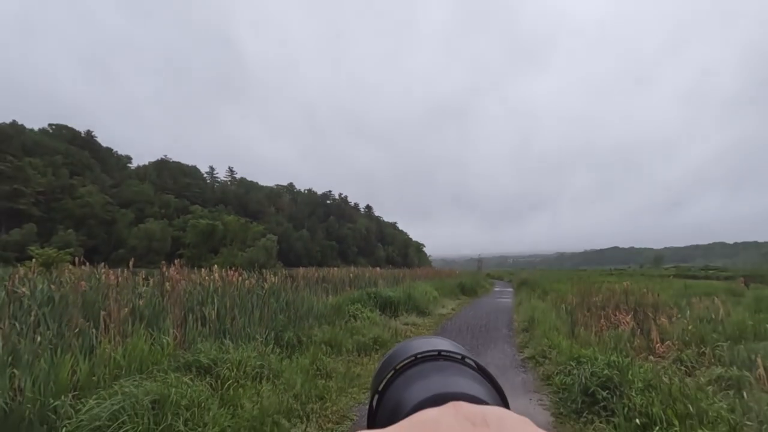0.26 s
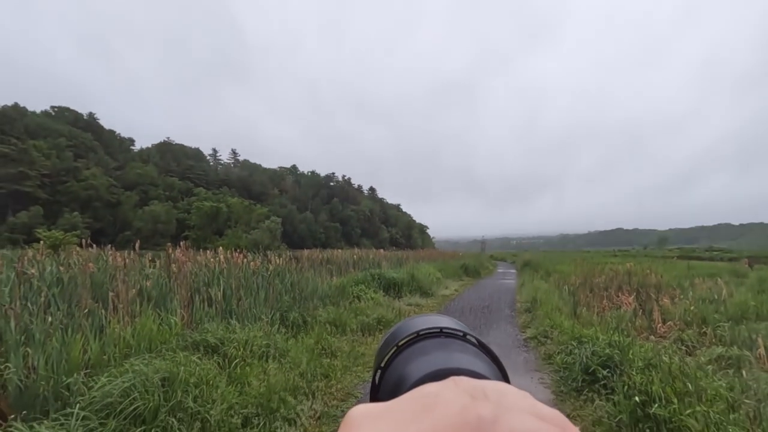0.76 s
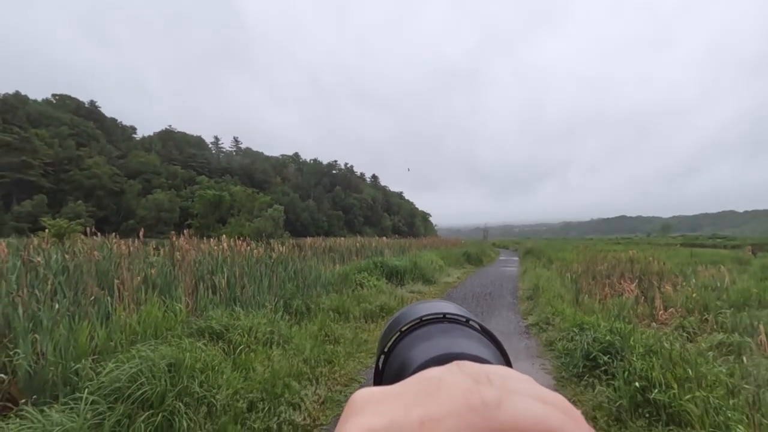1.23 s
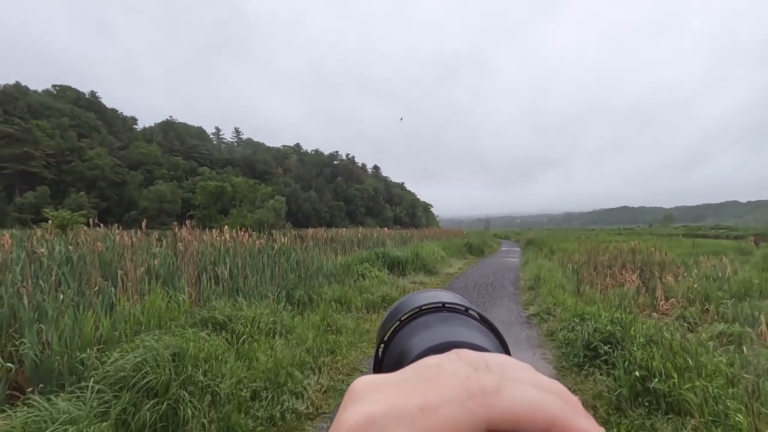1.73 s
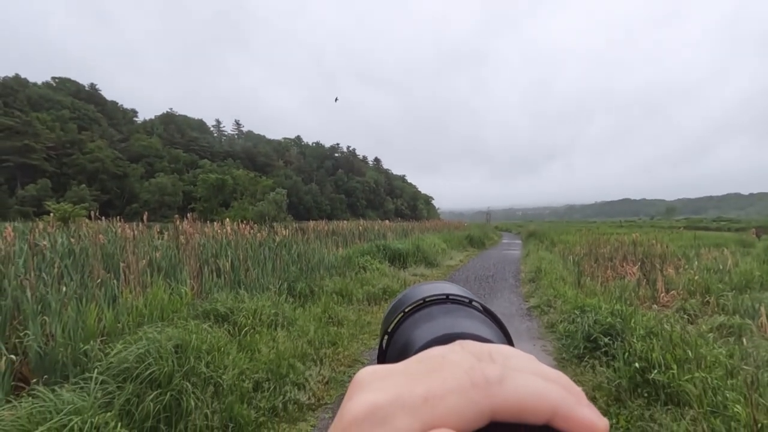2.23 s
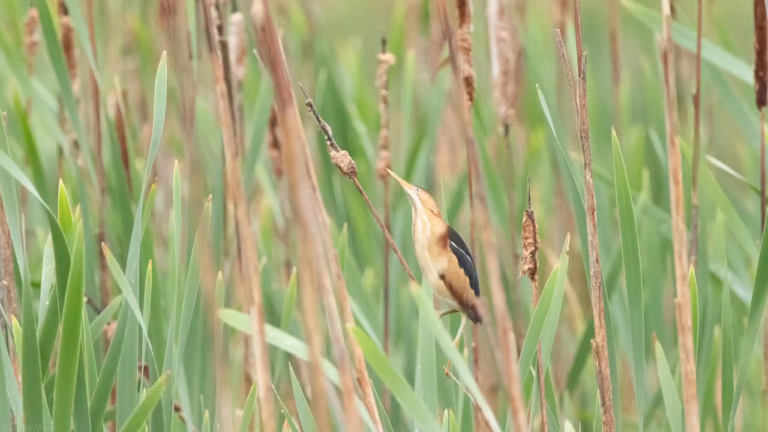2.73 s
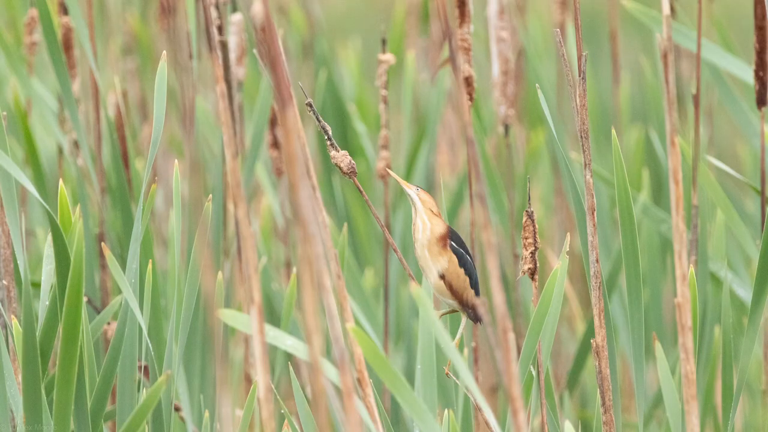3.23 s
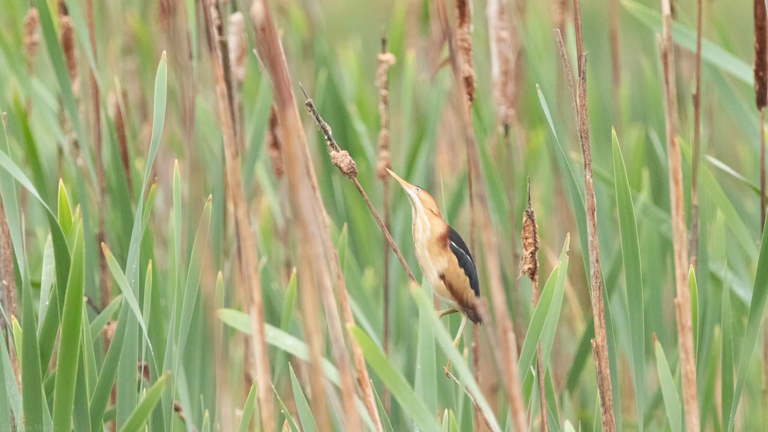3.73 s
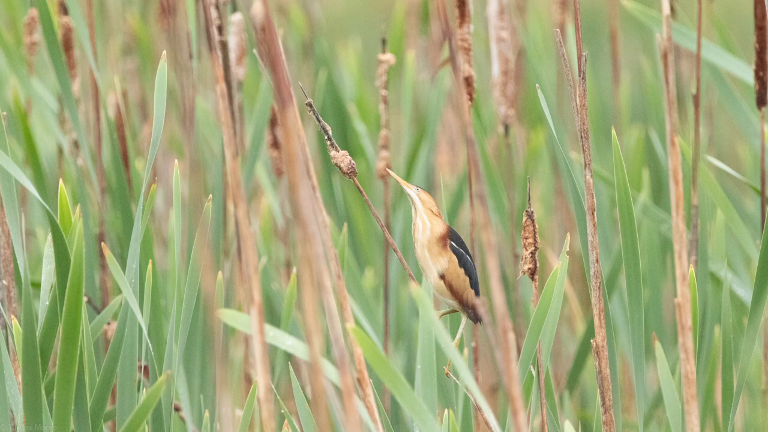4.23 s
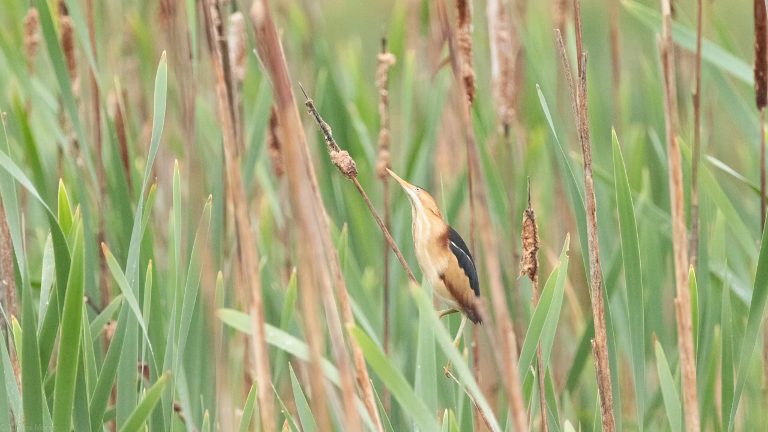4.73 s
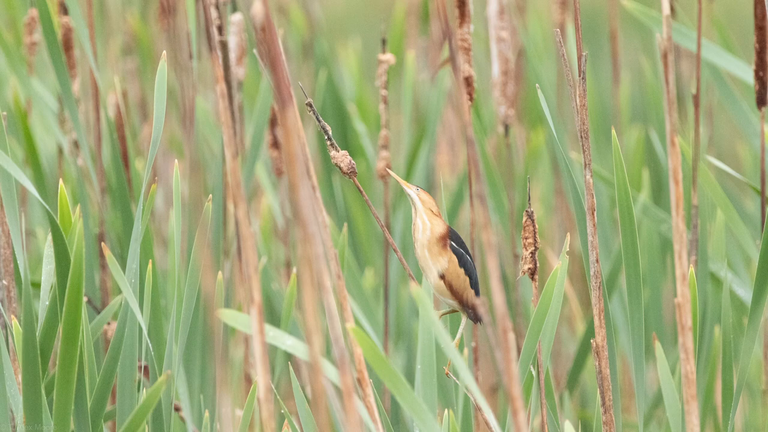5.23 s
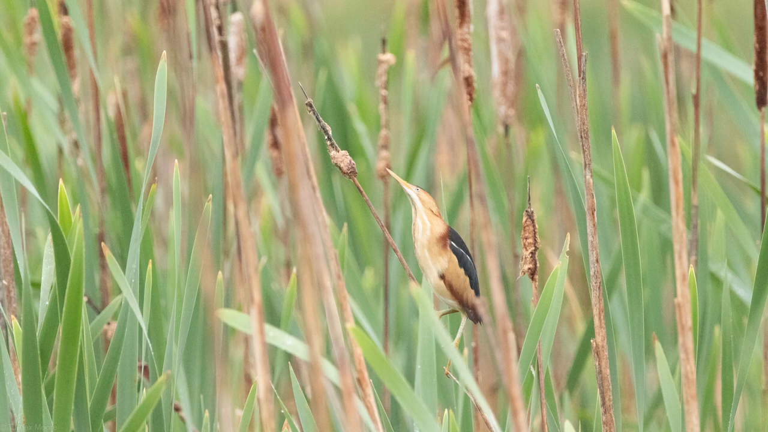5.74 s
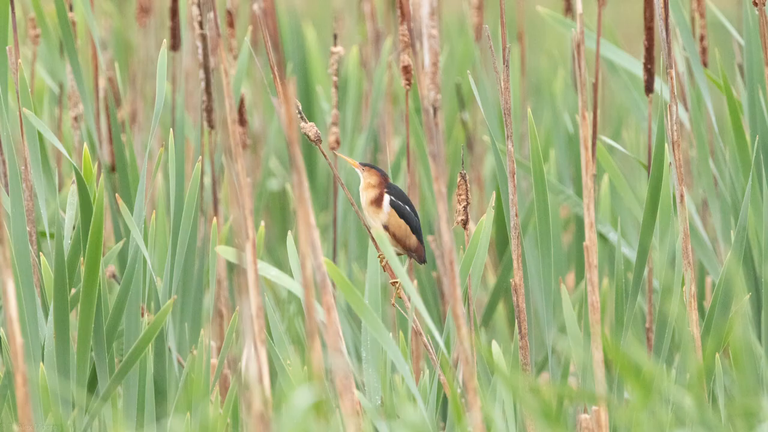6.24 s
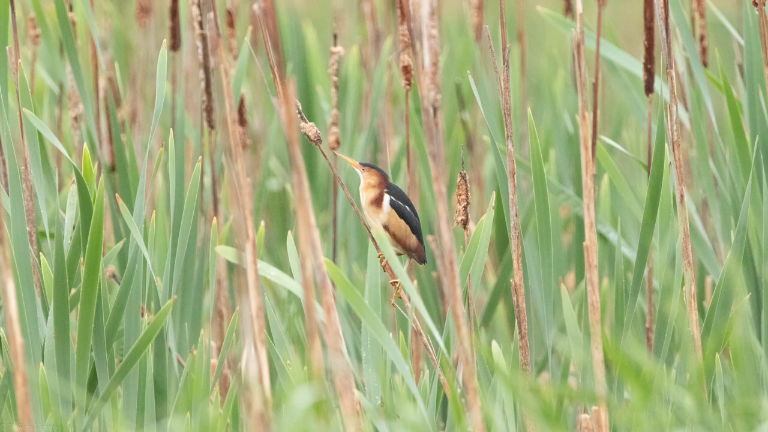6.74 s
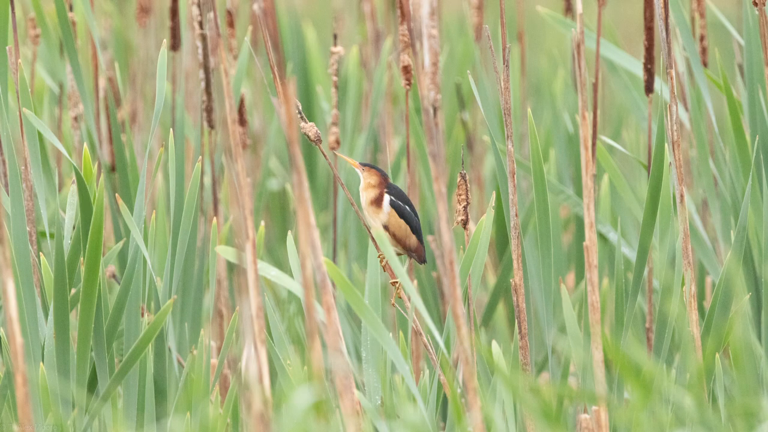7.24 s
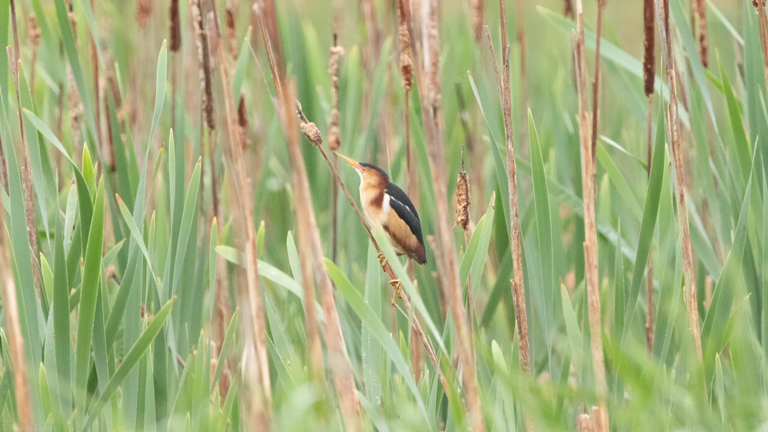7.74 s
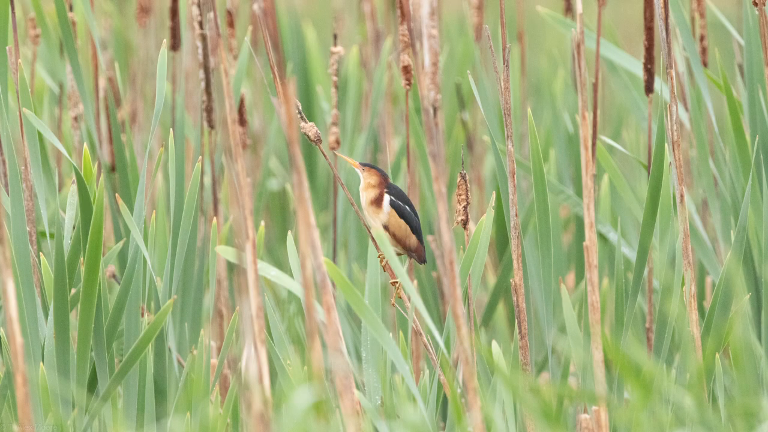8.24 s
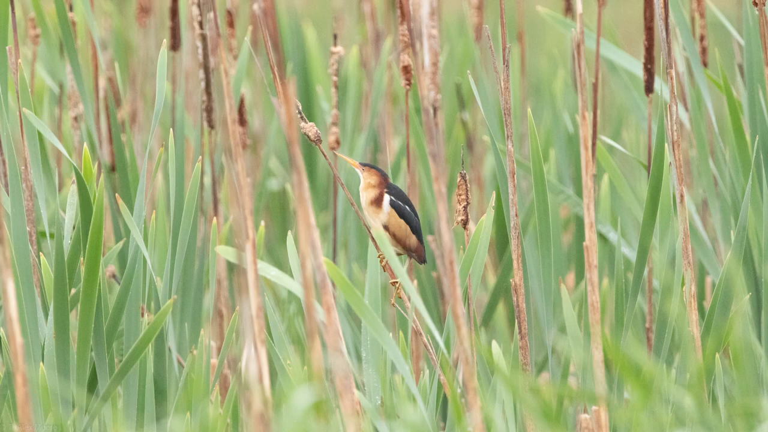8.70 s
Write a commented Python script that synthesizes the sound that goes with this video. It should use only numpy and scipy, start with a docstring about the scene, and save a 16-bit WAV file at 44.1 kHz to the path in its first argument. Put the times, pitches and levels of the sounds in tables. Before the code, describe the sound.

Two single camera shutter clacks close by in an open marsh, with small birds chirping, a frog twanging and light wind on the microphone.

```python
"""Camera in an open marsh

Close to the microphone a hand-held reflex camera takes two pictures: a latch ticks, then noise bursts ring
its body as mirror, curtains and winder clatter. Fingers knock on the lens barrel, exciting its damped modes.
In the reeds a frog twangs with rough pulses through a resonant throat, and birds slur, chip, whistle, rattle
and buzz on gliding tones. Filtered noise makes the wind on the microphone and a background hush of marsh
and microphone noise, over a distant chorus of short, blurred notes.
"""
import sys
import numpy as np
from scipy import signal
from scipy.fft import rfft, irfft
from scipy.io import wavfile
from scipy.ndimage import uniform_filter1d

SR = 44100
rng = np.random.default_rng(int(sys.argv[2]) if len(sys.argv) > 2 else 0)


def waveform_to_disk(signal):
    """Save audio, clipped to [-1, 1], as 16-bit WAV at the path in sys.argv[1]."""
    frames = np.transpose(np.atleast_2d(signal))
    scaled = np.clip(frames, -1, 1) * 32767
    samples = np.round(scaled).astype(np.int16)
    wavfile.write(sys.argv[1], SR, samples)


N = 395577
T = np.arange(N) / SR

# hard clatter of small camera parts, as a spectrum: [f/Hz, density/dB per Hz]
CLATTER = [(300, -12.5), (700, -3.5), (1300, 3), (2500, 3.5), (5000, 5.5), (6600, 0.5), (8000, -6),
           (11000, -17), (15000, -41)]
SLUR_T60_S = 0.7  # the high slurs carry to the wood and linger


def undb(db):
    """Decibels to gain."""
    return 10 ** (np.asarray(db) / 20)


def unit(x):
    """Scale to rms 1."""
    return x / np.sqrt(np.mean(x ** 2))


def fade(t, t60):
    """Exponential decay that starts at t = 0 and loses 60 dB in t60 seconds."""
    return (t >= 0) * np.exp(-np.log(1000) * np.maximum(t, 0) / max(abs(t60), 1 / SR))


def add(out, s, x):
    """Mix x into out from time s on."""
    i = max(int(s * SR), 0)
    k = max(min(x.shape[-1], N - i), 0)
    out[..., i:i + k] += x[..., :k]


def pan(left_db):
    """Gains of the two channels for a left-minus-right level."""
    return undb(np.array([[left_db], [-left_db]]) / 2)


def convolve(x, response):
    """Pass x through a response scaled to unit power."""
    response = np.atleast_2d(response / np.sqrt(np.sum(response ** 2, axis=-1, keepdims=True)))
    return signal.oaconvolve(np.atleast_2d(x), response, axes=-1)[:, :x.shape[-1]]


def colour(x, points):
    """Causal minimum-phase filter of unit power through (Hz, dB) points."""
    hz, db = np.transpose(points)
    size = 2 ** 14
    f = np.maximum(np.fft.rfftfreq(size, 1 / SR), 1)
    cepstrum = irfft(np.log(undb(np.interp(np.log(f), np.log(hz), db))))
    # folding the cepstrum forward in time makes the filter causal
    cepstrum[1:size // 2] *= 2
    cepstrum[size // 2 + 1:] = 0
    return convolve(x, irfft(np.exp(rfft(cepstrum))))


def ring(x, modes, in_phase=False):
    """Damped modes (Hz, width, dB) driven by x; neighbours swing against each other unless in phase."""
    t = T[:SR // 10]
    response = np.zeros(len(t))
    for k, (hz, width, db) in enumerate(modes):
        angle = 2 * np.pi * hz * t
        swing = np.cos(angle) if in_phase else (-1) ** k * np.sin(angle)
        response += undb(db) * width * np.exp(-np.pi * width * t) * swing
    return convolve(x, response)


def stereo_noise(size, side_db):
    """Noise with a part common to both sides and a part opposed between them."""
    mid, side = rng.standard_normal((2, size))
    return unit(mid + undb(side_db) * side * np.array([[1], [-1]]))


def walk(rate, size=N):
    """Smoothed random drift of rms 1, drawn afresh rate times a second."""
    k = int(SR / rate)
    steps = np.repeat(rng.standard_normal(size // k + 1), k)
    return unit(uniform_filter1d(uniform_filter1d(steps, k), k)[:size])


def scatter(x, t60):
    """Reeds and the wood's edge scatter a sound into a soft tail."""
    t = T[:SR]
    onset = 1 - np.exp(-t / 0.0029)
    return convolve(x, stereo_noise(len(t), side_db=-4.0) * fade(t, t60) * onset)


def rattle(t, t60, grain_db, side_db, blow):
    """A first blow, then a dying swarm of tiny collisions of uneven size."""
    sizes = unit(uniform_filter1d(undb(grain_db * rng.standard_normal(len(t))), size=12))
    force = stereo_noise(len(t), side_db) * sizes * fade(t, t60)
    force[:, 0] += blow
    return force


def note(hz, edge):
    """A bird's nearly pure tone on a pitch track, with soft ends."""
    window = signal.windows.tukey(len(hz), np.clip(edge, 0, 1))
    return np.sqrt(2) * window * np.sin(2 * np.pi * np.cumsum(hz) / SR)


def arc(length, start, middle, end):
    """A pitch track bending through three frequencies."""
    u = np.linspace(0, 1, max(int(length * SR), 2))
    return np.polyval(np.polyfit([0, .5, 1], [start, middle, end], 2), u)


def whistle(hz):
    """A whistled note; wide slurs are less steady than held ones."""
    unsteady = 0.0025 + 0.075 * np.std(hz) / np.mean(hz)
    tone = note(hz * (1 + unsteady * walk(700, len(hz))), edge=0.51)
    return tone * undb(2 * walk(110, len(hz)))


def buzz(length, centre, swing, rate, rough, fade_db, open_s):
    """A trill that starts as a plain tone, then snaps up and slides down many times a second."""
    t = T[:int(length * SR)]
    edge_s = 0.026  # swell and dying away, shortened in brief trills
    cycle = 2 * np.pi * np.cumsum(rate * (1 + 0.018 * walk(40.2, len(t)))) / SR
    sweep = np.sin(np.pi / 2 * signal.sawtooth(cycle, .15))
    opening = 1 - np.exp(-(t / open_s) ** 2)
    hz = centre + swing * opening * (sweep + rough * walk(500, len(t)))
    tone = note(hz, edge=min(2 * edge_s / length, .6))
    # the low turn of each sweep sounds strongest, and the loudness wavers
    return tone * centre / hz * undb(fade_db * t / length + 2 * walk(90, len(t)))


def background_hush():
    """A steady background hush of marsh and microphone noise, filtered noise swelling a little."""
    # background hush with microphone hiss near 12 kHz: [f/Hz, density/dB per Hz]
    hush = [(60, -10.5), (170, -4.5), (330, -10.5), (600, -16.5), (1300, -15.5), (2100, -23.5),
            (2700, -23.5), (3700, -25), (6000, -37), (7600, -35), (9500, -53), (12000, -47.5),
            (15000, -73.5)]
    return unit(colour(stereo_noise(N, side_db=-5.5), hush)) * undb(-61.0 + 1.72 * walk(2.089))


def wind():
    """Gusts rock the microphone, finer turbulence rides on them, single eddies thud."""
    # wind at the microphone: [t/s, strength/dB]
    gusts = [(0.0, -45.5), (0.52, -43.5), (1.0, -39.5), (1.4, -43), (1.98, -42), (2.06, -32.5),
             (2.3, -49.5), (2.38, -40.5), (2.66, -53), (3.86, -46.5), (3.92, -36.5), (4.28, -45),
             (4.36, -29), (4.88, -42), (5.46, -45), (5.74, -30.5), (6.06, -53), (6.14, -37.5), (6.46, -54),
             (6.72, -49.5), (6.79, -36), (6.98, -44.5), (7.04, -33.5), (7.68, -48.5), (8.0, -34.5),
             (8.4, -43), (8.48, -36), (8.66, -50), (8.86, -37.5), (8.96, -45)]
    # slow pressure swings, then finer turbulence: [f/Hz, density/dB per Hz]
    buffet = [(10, -5), (22, 3), (35, 0), (55, -5), (80, -15.5), (130, -35), (600, -90.5)]
    turbulence = [(40, -18.5), (95, 0.5), (170, -7), (260, -17), (500, -31), (1200, -52), (8000, -94.5)]
    # eddies that hit the microphone ports: [t/s, width/s, level/dB]
    eddies = [(0.611, 0.0022, -35), (0.768, 0.0032, -32), (0.982, 0.0029, -35), (4.375, 0.0058, -20.5),
              (4.489, 0.002, -15), (5.537, 0.0039, -31), (5.745, 0.0033, -23), (8.291, 0.0021, -33)]
    buffet_db, turbulence_db, gusts_per_s, gust_db = 1, -17.5, 16, 4
    strength = undb(np.interp(T, *np.transpose(gusts)) + gust_db * walk(gusts_per_s))
    slow = colour(stereo_noise(N, side_db=-13), buffet)
    # the gust sets the strength, so the random swell is evened out
    slow = slow / np.sqrt(uniform_filter1d(np.mean(slow ** 2, axis=0), size=4000))
    fine = unit(colour(stereo_noise(N, side_db=-6.5), turbulence))
    out = strength * (undb(buffet_db) * slow + undb(turbulence_db) * fine)
    for when, width, db in eddies:
        u = (T - when) / width
        out = out + undb(db) * (1 - u ** 2) * np.exp(-u ** 2 / 2)
    return out * pan(-5)


def chorus():
    """Many far birds, short slurs up and down, blurred by distance."""
    # far birds: [t/s, level/dB]
    distance_levels = [(0, -57.5), (.6, -56), (1.1, -65.5), (1.4, -77), (2.3, -69), (2.8, -66), (3.4, -66),
                       (4.3, -70.5), (5, -66), (5.8, -68.5), (6.8, -61.5), (7.5, -73), (8.97, -91.5)]
    out = np.zeros(N)
    for when, span, pitch, slope, bend, size in rng.random((1400, 6)):
        hz = 3150 + 3200 * pitch
        glide = -.13 + 0.3 * slope
        track = arc(0.01793 + 0.037 * span, hz * (1 + glide), hz * (1 + 0.2 * (bend - .5)), hz * (1 - glide))
        add(out, when * N / SR, undb(-12 * size - 4 * pitch) * note(track, edge=0.53))
    blurred = unit(undb(-4.5) * out + scatter(out, t60=.4))
    return blurred * undb(np.interp(T, *np.transpose(distance_levels)))


def slurs():
    """Falling slurs, alone or in even runs, each a straight downward glide of a whistle."""
    # runs: [first t/s, notes, spacing/s, note length/s, top f/Hz, end f/Hz, level/dB]
    runs = [(0, 1, 0, 0.015, 5300, 3730, -48.5), (0.619, 3, 0.15, 0.067, 8070, 5070, -64.5),
            (3.313, 3, 0.16, 0.055, 6700, 4880, -70), (4.888, 2, 0.17, 0.03, 8200, 4400, -63.5),
            (5.203, 5, 0.12, 0.075, 7390, 3700, -54.5), (6.927, 2, 0.165, .09, 7800, 5850, -67),
            (7.298, 1, 0, 0.051, 6880, 4280, -63.5)]
    out = np.zeros(N)
    for first, notes, apart, length, top, end, db in runs:
        for k in range(round(notes)):
            add(out, first + k * apart, undb(db) * whistle(np.linspace(top, end, int(length * SR))))
    return out


def frog():
    """A plucked-string call: rough pulses slacken in pitch, burst twice in a sinking throat and leave a low hum."""
    # twangs: [t/s, level/dB, half-width of the bright burst/s, second gulp/dB, hum/dB]
    twangs = [(.004, -30, 0.018, -3.5, 0), (2.024, -27, 0.017, -10, -4), (4.384, -37, 0.0061, -13.5, -12)]
    # throat resonances at the first burst: [f/Hz, width/Hz, level/dB]
    throat = [(354, 38, 16.5), (635, 310, 10), (1154, 210, 14), (1369, 82, 25.5), (1822, 150, 10.5),
              (2700, 258, 7.5)]
    # the call loses its treble steeply: [f/Hz, level/dB]
    treble_loss = [(250, 2), (1950, -4), (2350, -15.5), (5000, -32.5)]
    burst_s, gulp_s, gulp_width_s = 0.024, 0.062, 0.02
    gulp_sag = .1  # the throat sinks by this share for the second gulp
    t = T[:SR // 3]
    burst, gulp, hum = np.zeros((3, N))
    for s, db, width, gulp_db, hum_db in twangs:
        hz = 118 + 68 * np.exp(-t / .07)
        phase = 2 * np.pi * np.cumsum(hz * (1 + 0.016 * walk(158, len(t)))) / SR
        pulses = unit(sum(np.cos(k * phase) for k in range(2, 16)))
        rasp = rng.standard_normal(len(t))
        burst_shape = np.exp(-((t - burst_s) / width) ** 2)
        gulp_shape = np.exp(-((t - gulp_s) / gulp_width_s) ** 2)
        add(burst, s, undb(db) * burst_shape * (0.11 * pulses + .5 * rasp))
        add(gulp, s, undb(db + gulp_db) * gulp_shape * (0.12 * pulses + .2 * rasp))
        low = np.sin(2 * phase) + 0.97 * np.sin(3 * phase) + 0.64 * np.sin(4 * phase)
        hum_shape = np.minimum(t / 0.2, 1) * fade(np.maximum(t - .05, 0), t60=0.22)
        add(hum, s, undb(db + hum_db) * low * hum_shape)
    sunk = [(hz * (1 - gulp_sag), width, db) for hz, width, db in throat]
    call = colour(ring(burst, throat) + ring(gulp, sunk), treble_loss) * undb(-8.5) + hum
    return (call + undb(-14) * scatter(call, t60=0.64)) * pan(5.3)


def twitterer():
    """Each twitter is a fast buzz that dips and rises steeply, then a flick downwards."""
    # twitters: [t/s, pitch f/Hz, level/dB]
    twitters = [(.108, 4200, -49), (.236, 4280, -52), (5.917, 4550, -56), (6.036, 4430, -51.5),
                (6.812, 4550, -43.5)]
    # evenly spaced course of the buzz: [share of its pitch]
    course = (0.89, 1.11, 1.02, 0.99, 1.02, 1.2, 1)
    length_s, swing_hz, sweeps_per_s = .066, 300, 205
    flick_s, flick_start, flick_end, flick_db = 0.018, 1.13, .87, -5  # start and end in shares of the pitch
    out = np.zeros(N)
    u = np.linspace(0, 1, int(length_s * SR))
    shape = np.interp(u, np.linspace(0, 1, len(course)), course)
    for s, hz, db in twitters:
        trill = buzz(length_s, hz * shape, swing_hz, sweeps_per_s, rough=0.092, fade_db=1.5, open_s=0.0063)
        add(out, s, undb(db) * trill)
        flick = hz * np.geomspace(flick_start, flick_end, int(flick_s * SR))
        add(out, s + length_s - flick_s / 4, undb(db + flick_db) * whistle(flick))
    return out


def fingers():
    """The grip shifts: short knocks ring the lens barrel, with dry ticks; a creak is a string of faint ones."""
    # clear finger knocks: [t/s, level/dB, dry tick/dB]
    knocks = [(0.203, -31.5, -15), (.2105, -41, -22), (.261, -46.5, -24), (.281, -43.5, -15),
              (1.111, -46.5, -1), (1.164, -44, -9), (1.187, -43.5, -10), (1.222, -44.5, -17),
              (1.251, -46.5, -12), (1.708, -43, -14), (4.376, -44, -22), (4.6751, -43, -18),
              (6.652, -49, 0), (7.656, -49, -11), (8.400, -58.5, -3.5)]
    # creaks of the grip: [t/s, length/s, level/dB]
    creaks = [(0.222, .05, -45), (0.906, .06, -54), (4.486, .03, -53.5)]
    # lens barrel modes: [f/Hz, width/Hz, level/dB]
    barrel = [(426, 133, -0.5), (730, 37, 4), (990, 96, 6.5), (1380, 97, 5.5), (1820, 220, 3),
              (2120, 230, 2.5), (2836, 69, -1.5), (5150, 130, -8.5), (3540, 580, -17)]
    ticks_per_s, spread_db, creak_tick_db = 110, 2, -13
    knock, tick = np.zeros((2, 2, N))
    touches = list(knocks)
    for s, length, db in creaks:
        slips = np.arange(0, length, 1 / ticks_per_s)
        for after, (late, size) in zip(slips, rng.standard_normal((32, 2))):
            touches.append((s + after + .25 * late / ticks_per_s, db + spread_db * size, creak_tick_db))
    for s, db, tick_db in touches:
        force = undb(db) * rattle(T[:SR // 10], t60=0.045, grain_db=-6.0, side_db=-7.5, blow=5.3)
        add(knock, s, force)
        add(tick, s, undb(tick_db) * force)
    return ring(knock, barrel) + colour(tick, CLATTER)


def blackbirds():
    """Two voices alternate in rattles that slow a little; a reedy note opens the last."""
    # rattles: [first pulse t/s, last pulse t/s, pulses, floor f/Hz of the low voice, level/dB,
    #           low voice/dB, scattered part/dB]
    songs = [(.2975, 0.766, 27, 3640, -55, -9, -5), (2.641, 3.025, 16, 2850, -68, 6, 7.5),
             (6.601, 6.9964, 23, 2717, -50, -2, -2.5)]
    # reedy note, harmonics from the second up: [level/dB]
    reedy_levels = [-62.5, -57, -51.5, -54, -51]
    reedy_s, reedy_length_s, reedy_hz, reedy_sag = 6.538, 0.068, 874, 0.013
    high_hz, high_s = (5070, 4730, 3070), 0.0044  # a steep flick opens each pulse
    low_hz, low_lag_s, low_s, low_fall_s = 4464, 0.0066, 0.014, 0.00293  # a slower fall answers it
    low_rough, slowing = 0.058, 1.04  # a power above 1 spreads the later pulses
    near_t60_s, far_db = 0.062, -14  # a short blur from the reeds, a faint long tail from the wood
    out = np.zeros((2, N))
    flick = note(arc(high_s, *high_hz), edge=0.21)
    fall = np.exp(-T[:int(low_s * SR)] / low_fall_s)
    for first, last, pulses, floor_hz, db, low_db, scatter_db in songs:
        song = np.zeros(N)
        times = first + (last - first) * np.linspace(0, 1, round(pulses)) ** slowing
        for s, (high, low, detune) in zip(times, rng.standard_normal((40, 3))):
            unsteady = 1 + 0.0215 * detune + low_rough * walk(1100, len(fall))
            answer = note((floor_hz + (low_hz - floor_hz) * fall) * unsteady, edge=0.22)
            add(song, s, undb(db + high) * flick)
            add(song, s + low_lag_s, undb(db + low_db + low) * answer)
        out += song + undb(scatter_db) * scatter(song, near_t60_s) + undb(far_db) * scatter(song, SLUR_T60_S)
    hz = reedy_hz * arc(reedy_length_s, 1 + reedy_sag, 0.95, 1 - reedy_sag)
    for k, db in enumerate(reedy_levels, 2):
        add(out, reedy_s, undb(db) * whistle(k * hz))
    return out


def short_notes():
    """Single notes that rise, arch or sag, each bent through three pitches."""
    # notes: [t/s, length/s, start f/Hz, middle f/Hz, end f/Hz, level/dB]
    singles = [(0.398, 0.086, 5400, 6630, 7100, -67), (0.49, 0.03, 4160, 4400, 4300, -58),
               (.76, 0.053, 2650, 3000, 3650, -60), (1.022, 0.13, 3380, 4600, 6930, -66),
               (1.509, 0.065, 2190, 2110, 1960, -71), (2.239, .045, 3970, 3470, 2950, -69),
               (2.537, .032, 1370, 1540, 1680, -57), (2.577, 0.09, 1285, 1487, 1240, -62.5),
               (2.594, 0.046, 4110, 3560, 3690, -58.5), (2.828, 0.036, 1770, 1850, 2020, -59),
               (2.836, 0.028, 3680, 3740, 3880, -53.5), (2.86, 0.06, 1300, 1515, 1280, -59.5),
               (3.157, 0.072, 1310, 1495, 1320, -63), (3.382, 0.036, 3180, 3460, 3950, -66),
               (3.536, 0.062, 2800, 3320, 4130, -73), (4.448, .06, 2490, 2665, 3130, -59),
               (4.804, 0.058, 2780, 2665, 2460, -61), (5.481, 0.048, 2700, 2750, 3220, -58),
               (5.53, 0.054, 3000, 2730, 2540, -55.5), (5.791, 0.16, 3620, 4830, 7340, -64.5),
               (6.421, 0.029, 2640, 2516, 2480, -57), (6.513, 0.062, 2230, 2780, 2650, -51.5),
               (7.22, 0.091, 4760, 5650, 7100, -67), (7.901, 0.011, 6295, 6060, 5420, -64)]
    out = np.zeros(N)
    for s, length, start, middle, end, db in singles:
        add(out, s, undb(db) * whistle(arc(length, start, middle, end)))
    return out


def whistlers():
    """Chips with three harmonics lift, then drop; held whistles scoop up to their pitch."""
    # one bird's contact chips: [t/s, level/dB]
    chips = [(1.18, -55.5), (2.316, -52), (3.453, -57.5), (3.988, -64), (4.334, -55.5), (5.362, -54.5),
             (7.585, -56.5), (8.59, -60)]
    # chip harmonics from the first up, the second carries it: [level/dB]
    harmonics = [-14.5, -1, -18.5]
    # held whistles: [t/s, length/s, pitch f/Hz, level/dB]
    held = [(0.757, 0.066, 4000, -64), (0.872, 0.27, 3920, -69.5), (1.27, 0.15, 3850, -69.5),
            (1.426, 0.24, 3900, -77), (1.438, 0.12, 5410, -70), (1.527, .06, 5030, -71.5),
            (1.758, 0.14, 5380, -70), (1.879, 0.1, 7080, -67), (2.162, 0.093, 7120, -65.5),
            (2.15, 0.13, 5370, -73), (2.263, 0.17, 1263, -48), (2.48, 0.087, 7150, -73),
            (2.627, 0.14, 5230, -66), (2.744, 0.048, 2312, -48), (3.007, 0.28, 5260, -69.5),
            (4.737, 0.089, 5790, -65), (4.87, 0.13, 3190, -60.5), (4.925, 0.059, 5830, -55.5),
            (5.092, 0.057, 5590, -52), (6.443, 0.096, 1228, -56), (8.645, 0.078, 7280, -57.5)]
    chip_s, chip_arc_hz = .042, (1775, 2002, 1559)
    scoop_share, scoop_s = 0.26, 0.0065
    out = np.zeros(N)
    for s, db in chips:
        for k, harmonic_db in enumerate(harmonics, 1):
            add(out, s, undb(db + harmonic_db) * whistle(k * arc(chip_s, *chip_arc_hz)))
    for s, length, hz, db in held:
        scoop = 1 - scoop_share * np.exp(-T[:int(length * SR)] / scoop_s)
        add(out, s, undb(db) * whistle(hz * scoop))
    return out


def shutter():
    """The latch ticks; mirror, curtains and winder each strike the body and rattle out."""
    # pictures taken: [latch t/s, latch level/dB, curtain t/s, mechanism level/dB]
    shots = [(2.3203, -18.5, 2.4495, -0.5), (6.1317, -19, 6.2163, -0.5)]
    # strokes of one cycle: 3 as the mirror swings up, 2 as it lands and bounces, 3 as the curtains run and
    # stop, 2 as the mirror drops and settles, 4 as the winder cocks it again:
    # [t after the curtain/s, level/dB, rattle t60/s, bright sizzle/dB, thump/dB]
    strokes = [(-.0663, -26.5, 0.054, -22, -10), (-.0595, -24.5, 0.093, -13, -12.5),
               (-.048, -25.5, 0.085, -23, -11.5), (-.0332, -18, .028, -19, -3.5),
               (-.0258, -21.5, 0.044, -23, -5), (-.0052, -24.5, 0.062, -11, -6.5),
               (0, -10.5, 0.011, -10, -6.5), (.003, -17.5, 0.017, -12.5, 4.5),
               (0.012, -24.5, 0.059, -20, -5.5), (.018, -24.5, 0.032, -20, -10.5),
               (0.0297, -16.5, 0.042, -11.5, -8), (0.0333, -19, 0.023, -14.5, -9.5),
               (.038, -20, 0.066, -20, -8), (.046, -24.5, 0.074, -18, -3)]
    # modes of the camera body, then of the latch: [f/Hz, width/Hz, level/dB]
    body_modes = [(1350, 78, -4.5), (1730, 120, -0.5), (2033, 35, 4), (2310, 63, -3), (2540, 40, 0.5),
                  (2860, 91, 0), (3810, 82, -1.5), (4315, 120, -2.5), (4930, 210, -5), (5630, 210, 0.5),
                  (5960, 172.8, -8), (6400, 69, -4), (9900, 100, -12), (12400, 180, -23.5)]
    latch_modes = [(1160, 290, 0), (1588, 320, 2), (2670, 220, 3.5), (3586, 210, -1), (4770, 480, 0),
                   (5430, 600, 3.5), (7150, 570, -7.5), (9260, 420, -39)]
    # spectra of the bright small parts and of the dull thump: [f/Hz, density/dB per Hz]
    sizzle_colour = [(500, -64.5), (4000, -36.5), (7500, 3.5), (9800, 3.5), (11200, -6), (12400, 4),
                     (13000, -16.5), (15500, -22)]
    thump_colour = [(30, -10.5), (90, 8), (200, -2.5), (320, -1), (480, -6.5), (680, -3), (1000, -1.5),
                    (1800, -22.5), (9000, -70)]
    sizzle_share = 0.96  # of the rattle t60: the bright parts settle sooner
    latch, parts, sizzle, thump = np.zeros((4, 2, N))
    t = T[:SR // 6]
    for latch_s, latch_db, curtain_s, shot_db in shots:
        add(latch, latch_s, undb(latch_db) * rattle(t, t60=.011, grain_db=0.5, side_db=-7.5, blow=6.7))
        for delay, db, t60, sizzle_db, thump_db in strokes:
            # long rattles are sliding parts that take a moment to get going; short ones are dead stops
            push = undb(shot_db + db) * (1 - np.exp(-(t + 1 / SR) / (.011 * t60)))
            force = push * rattle(t, t60, grain_db=6.5, side_db=-9, blow=1.8)
            bright = push * rattle(t, sizzle_share * t60, grain_db=6.5, side_db=-3.0, blow=0.98)
            add(parts, curtain_s + delay, force)
            add(sizzle, curtain_s + delay, undb(sizzle_db) * bright)
            add(thump, curtain_s + delay, undb(thump_db) * force.mean(axis=0))
    body = undb(-7.5) * ring(parts, body_modes, in_phase=True) + colour(parts, CLATTER)
    tick = ring(latch, latch_modes) + undb(-14.5) * colour(latch, CLATTER)
    bright_and_dull = colour(sizzle, sizzle_colour) * pan(5.49) + colour(thump, thump_colour) * pan(-.8)
    return body * pan(.3) + tick * pan(-2.3) + bright_and_dull


def trillers():
    """Buzzing trills of several birds, tones swept up and down in pitch, some hoarse and sinking."""
    # trills: [t/s, length/s, centre f/Hz, glide/Hz, swing/Hz, sweeps per s, hoarseness as share of the
    #          swing, level/dB, level change over the note/dB, time for the swing to open/s]
    trills = [(2.62, 0.021, 1646, 2, 170, 230, .1, -53.5, 1, 0.0022),
              (2.728, 0.055, 2080, -2, 200, 280, 0.28, -55, -0.5, .005),
              (2.788, 0.22, 4106, -2, 1245, 130, 0.198, -57.5, -11, 0.00194),
              (3.729, 0.45, 3400, 0, 219, 87, 0.58, -76, 4.5, 0.0091),
              (4.174, .17, 2910, -300, 201, 76, .8, -69, -2.5, 0.011),
              (4.878, 0.31, 2600, -230, 111, 71, 0.98, -58, -13.5, .01),
              (5.745, 0.21, 2510, -260, 45.2, 52, 1.03, -63, -6, .01),
              (6.299, 0.039, 1770, -3, 110.6, 58, 0.46, -45, -5, .005),
              (6.369, 0.058, 5200, 4, 330, 260, 0.09, -63.5, 12, 0.018),
              (8.06, 0.18, 3730, 0, 115, 123, .05, -57, -1.5, .01),
              (8.411, 0.19, 3735, 3, 111.5, 112, 0.11, -59, 1.5, 0.0091),
              (8.772, 0.18, 5770, -150, 605, 160, 0.16, -50.5, -22, 0.032)]
    out = np.zeros(N)
    for s, length, hz, glide, swing, rate, rough, db, fade_db, open_s in trills:
        centre = hz + glide * np.linspace(0, 1, int(length * SR))
        add(out, s, undb(db) * buzz(length, centre, swing, rate, rough, fade_db, open_s))
    return out


def birds():
    """The nearer birds, heard directly and scattered by the reeds."""
    clear, short, falls, trills = whistlers() + twitterer(), short_notes(), slurs(), trillers()
    far = undb(-6.5) * clear + undb(-0.5) * short + undb(-0.5) * trills
    tails = scatter(far, t60=0.35) + undb(-2) * scatter(falls, SLUR_T60_S)
    return (clear + short + falls + trills + tails + blackbirds()) * pan(-0.31)


def scene():
    """Camera close by, animals in the reeds, wind on the microphone, a background hush."""
    camera = shutter()
    camera_in_marsh = camera + undb(-30.5) * scatter(camera, t60=.3)
    return camera_in_marsh + fingers() + frog() + birds() + chorus() + wind() + background_hush()


def record(dry):
    """The recorder cuts the top with a steep low-pass at 14.7 kHz."""
    return signal.sosfilt(signal.ellip(12, .2, 70, 14700, fs=SR, output="sos"), dry)


dry = scene()
out = record(dry)
waveform_to_disk(out)
```